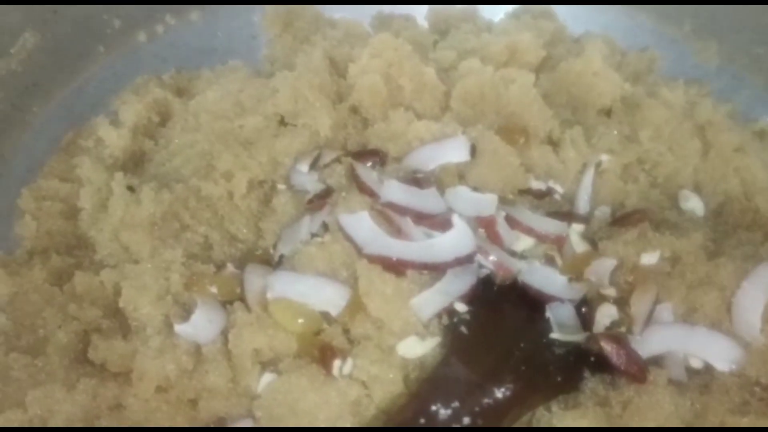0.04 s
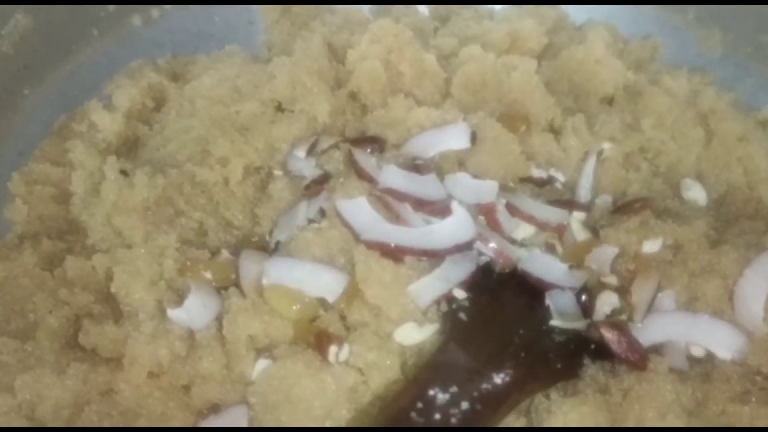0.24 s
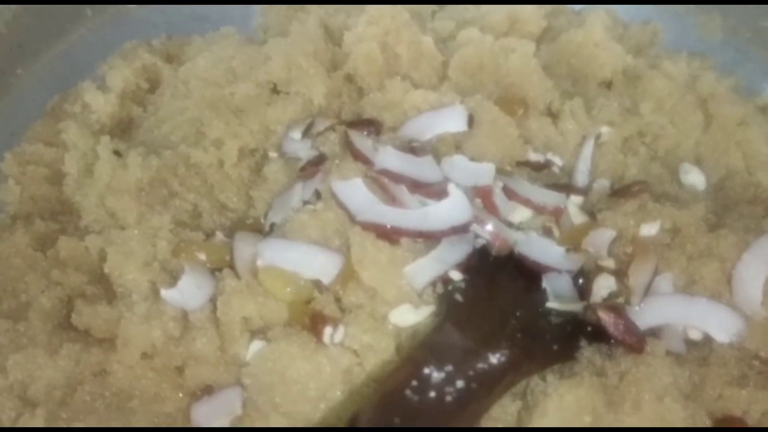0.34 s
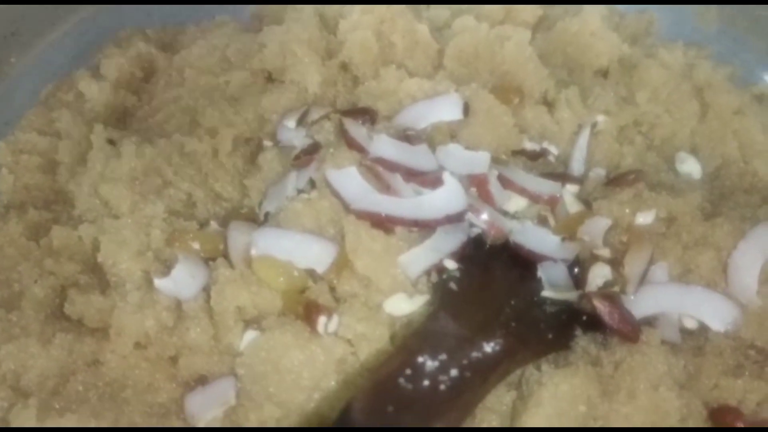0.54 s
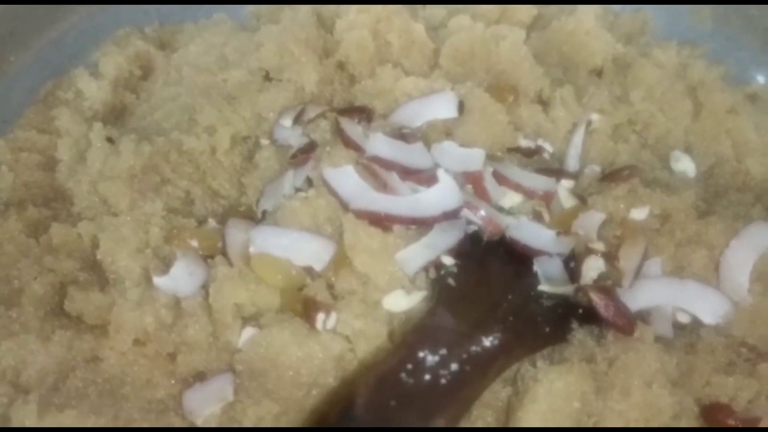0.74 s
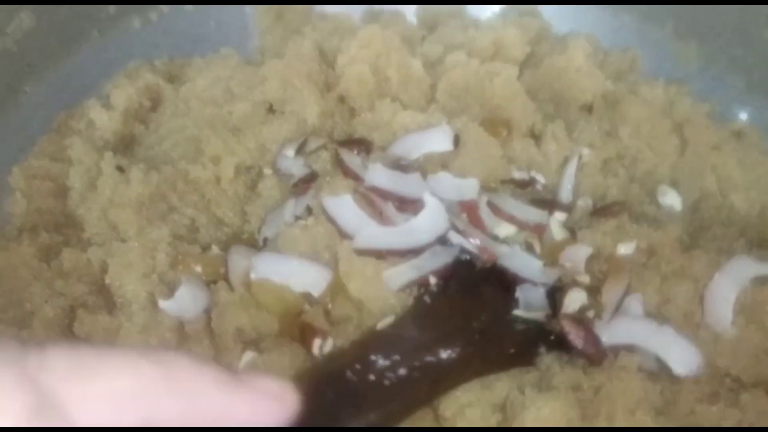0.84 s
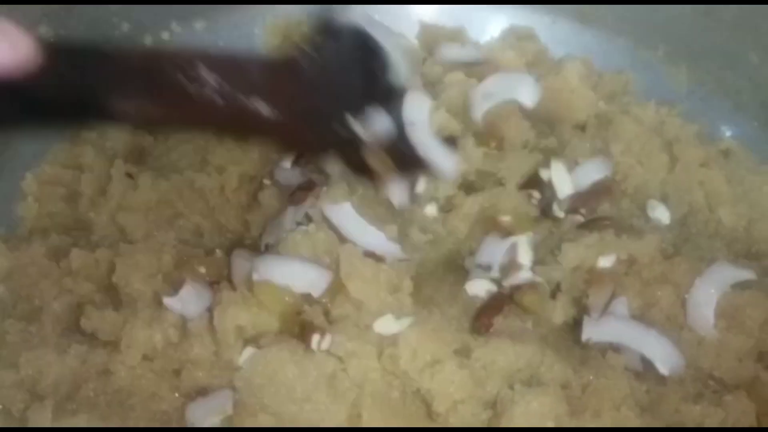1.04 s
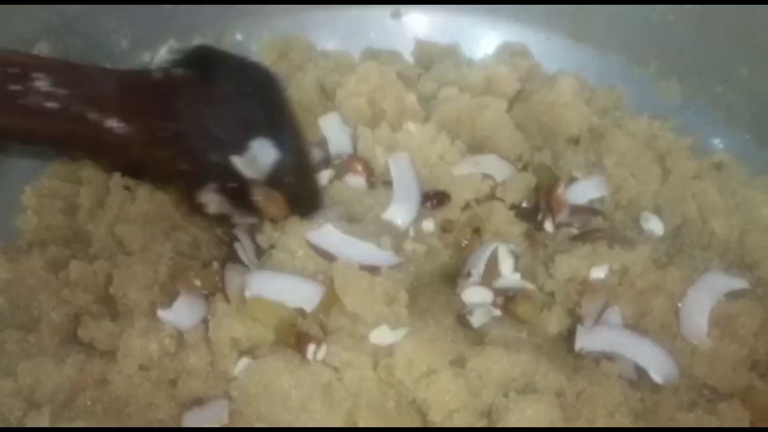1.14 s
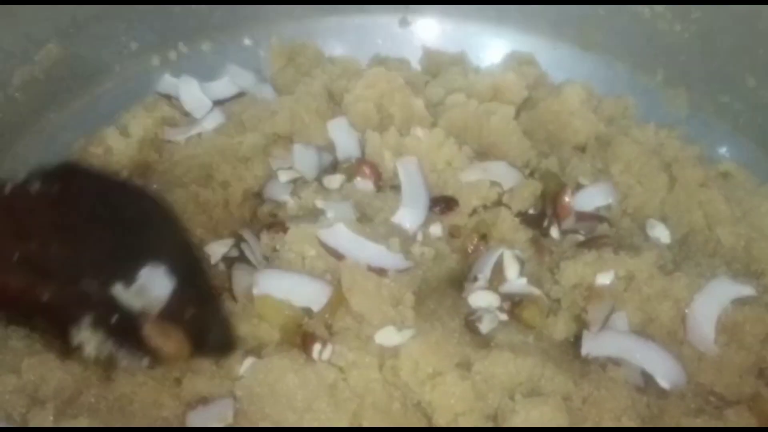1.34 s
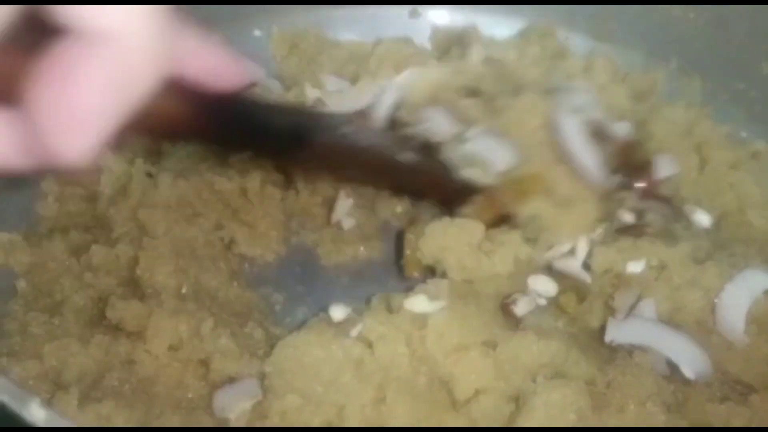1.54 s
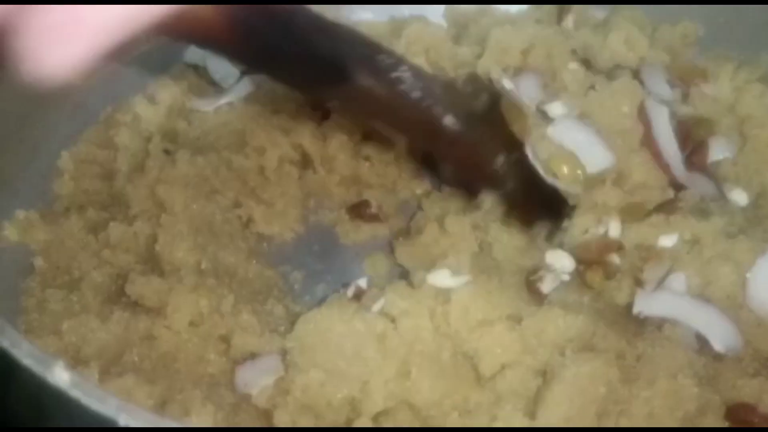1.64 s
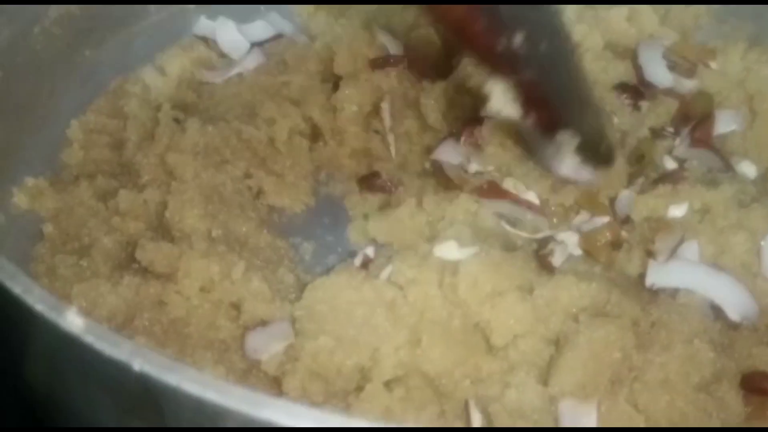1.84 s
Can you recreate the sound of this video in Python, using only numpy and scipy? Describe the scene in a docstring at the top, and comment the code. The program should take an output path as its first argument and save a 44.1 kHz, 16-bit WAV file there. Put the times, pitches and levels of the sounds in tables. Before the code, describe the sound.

A wooden spoon scrapes and knocks a metal pot of thick semolina: a hard gritty dig first, a softer push, then a short turning scrape, heard close in a small kitchen over faint hiss.

```python
"""Stirring thick halwa in a metal pot

A wooden spoon works thick semolina halwa in a metal pot, close by in a small kitchen, in three strokes.
The spoon knocks the pot (damped modes) and scrapes over its bottom (irregular slip bursts through resonances).
The pot sings faintly when pressed and drums low on its support; the mixture squeaks and rustles.
Under it lie a low hum, soft air noise and a hiss almost wholly on the left, with two thin high ticks."""
import sys
import numpy as np
from scipy import signal
from scipy.fft import rfft, irfft, next_fast_len
from scipy.io import wavfile
from scipy.ndimage import uniform_filter1d, map_coordinates

SR = 44100
rng = np.random.default_rng(int(sys.argv[2]) if len(sys.argv) > 2 else 0)


def wrap_up_sound(samples):
    """Save the sound to the file named by the first command line argument, as 16-bit audio."""
    columns = np.atleast_2d(samples).T
    # keep every value between -1 and 1, then stretch to whole-number steps
    tamed = np.clip(columns, -1, 1)
    steps = np.round(tamed * 32767).astype(np.int16)
    wavfile.write(sys.argv[1], SR, steps)


N = 83790


def amp(db):
    """Decibels to gain."""
    return 10 ** (np.asarray(db) / 20)


def unit(x):
    """Scale to rms 1."""
    return x / np.sqrt(np.mean(x ** 2) + 1e-20)


def along(points, hz):
    """Read a curve of (Hz, value) points on a log frequency axis."""
    f, v = np.transpose(points)
    return np.interp(np.log(hz + 1), np.log(f + 1), v)


def gains(rows):
    """A gain per sample for each dB column, silent outside the rows."""
    s, *cols = np.transpose(rows)
    t = np.arange(N) / SR
    inside = (t >= s[0]) * (t <= s[-1])
    return [amp(np.interp(t, s, c)) * inside for c in cols]


def filtered(x, response):
    """Shape x by a response of frequency, padded so the tail does not wrap."""
    m = next_fast_len(x.shape[-1] + 8192)
    shaped = irfft(rfft(x, m) * response(np.fft.rfftfreq(m, 1 / SR)), m)
    return shaped[..., :x.shape[-1]]


def add(out, s, x):
    """Mix x into out at time s."""
    i = round(s * SR)
    out[:, i:i + x.shape[1]] += x[:, :N - i]


# stereo width, 1 = both sides the same: pitch_hz [Hz], likeness [0-1]
LIKENESS = [(60, 0.92), (130, 0.98), (220, 0.89), (400, 0.7), (700, 0.67), (1300, 0), (2400, 0),
            (15000, 0.3)]


def half_angle(hz):
    """Half the phase angle whose cosine is the left-right likeness."""
    return np.arccos(np.clip(along(LIKENESS, hz), -1, 1)) / 2


def spread(pair):
    """Turn two unrelated signals into left and right, most alike in the bass."""
    mid_side = lambda hz: np.array([np.cos(half_angle(hz)), np.sin(half_angle(hz))])
    mid, side = filtered(pair, mid_side)
    return np.array([mid + side, mid - side])


def noise(spectrum):
    """Coloured stereo noise of rms 1."""
    pair = spread(rng.standard_normal((2, N)))
    return unit(filtered(pair, lambda hz: amp(along(spectrum, hz))))


def ring(modes, t):
    """Damped sine modes, slightly scattered in level; the less alike ones differ in phase left to right."""
    out = np.zeros((2, len(t)))
    for hz, db, t60, *_ in modes:
        apart = half_angle(hz) * rng.choice([-1, 1]) * np.array([[1], [-1]])
        decay = amp(db + rng.normal(0, 1.1) - 60 * t / t60)
        out += decay * np.sin(2 * np.pi * hz * t + apart)
    return out


# colours of the three steady beds: pitch_hz [Hz], level_db [dB, relative]
HUM_COLOUR = [(25, -34), (50, -25), (80, -2), (115, 6), (170, 1), (280, -16), (600, -46)]
AIR_COLOUR = [(40, -20), (150, -19), (300, 1), (420, 2), (750, -3), (1100, -5), (1450, 3), (2600, -5),
              (4100, -4), (4600, 6.5), (5400, 11), (6200, -3.5), (7000, -10), (9000, -66)]
HISS_COLOUR = [(3500, -75), (4200, -28), (4500, 3), (5400, -5.5), (7000, 1), (9300, -7.5), (12000, -2),
               (15700, 2.5)]
# slow level of the whole bed: time_s [s], level_db [dB]
BED_LEVEL = [(0, 0), (.55, -0.5), (.8, 0.5), (1.2, 0), (1.5, 0.5), (1.9, 0.5)]
HUM_DB, AIR_DB, HISS_LEFT_DB = -65, -57, -46
HISS_RIGHT_DB = -33.5  # relative to the left
HISS_GRAIN_DB, HISS_WAVER_DB, WAVERS_PER_S = 2, 0.13, 13.9
SPITS_PER_S, SPIT_DB = 20, 5


def background():
    """Low hum, soft air noise and a grainy, wavering hiss with random 1 ms spits."""
    t = np.arange(N) / SR
    grain_db = HISS_GRAIN_DB * unit(uniform_filter1d(rng.standard_normal(N), size=50))
    spit_starts = rng.random(N) < SPITS_PER_S / SR
    spits = np.minimum(np.convolve(spit_starts, np.ones(SR // 1000), "same"), 1)
    waver_db = HISS_WAVER_DB * map_coordinates(rng.standard_normal(SR // 100), [t * WAVERS_PER_S])
    hiss = unit(noise(HISS_COLOUR) * amp(grain_db + waver_db + SPIT_DB * spits))
    hiss = hiss * amp([[HISS_LEFT_DB], [HISS_LEFT_DB + HISS_RIGHT_DB]])
    level = amp(np.interp(t, *np.transpose(BED_LEVEL)))
    return level * (amp(HUM_DB) * noise(HUM_COLOUR) + amp(AIR_DB) * noise(AIR_COLOUR) + hiss)


# thin high ticks: start_s [s], level_db [dB, on the left], fall_30db_s [s to fall 30 dB]
HIGH_TICKS = [(.895, -41, 0.016), (1.649, -42.5, 0.056)]
TICK_HZ, TICK_WIDTH_HZ = 11460, 140


def ticks():
    """Narrow bands of decaying noise, very high and stronger on the left."""
    out, t = np.zeros((2, N)), np.arange(SR // 10) / SR
    narrow = lambda hz: 1 / np.hypot(1, (hz - TICK_HZ) / TICK_WIDTH_HZ)
    for s, db, fall_s in HIGH_TICKS:
        band = unit(filtered(rng.standard_normal((2, len(t))), narrow))
        add(out, s, band * amp(db - 30 * t / fall_s))
    return out * amp([[0], [-9]])


ROOM_T60_S, ROOM_DB = 0.19, -7.5


def room(x):
    """The kitchen's short reverberation: decaying noise that begins after 5 ms."""
    t = np.arange(SR // 2) / SR
    tail = rng.standard_normal((2, len(t))) * amp(-60 * t / ROOM_T60_S) * (t > .005)
    wet = signal.fftconvolve(x, tail / np.linalg.norm(tail[0]), axes=1)[:, :N]
    return amp(ROOM_DB) * wet


# the pot on its support: pitch_hz [Hz, before the thud's ratio], level_db [dB, relative], t60_s [s]
SUPPORT_MODES = [(67, -11.5, 0.18), (106.8, 4, 0.17), (158.7, -1.5, 0.15), (195, -7.5, 0.093)]
# thuds of the rocking pot: start_s [s], level_db [dB, relative], pitch_ratio [x], rise_s [s]
ROCKING_THUDS = [(0.238, -35, 0.85, 0.0068), (.266, -28, 1.01, 0.0035), (0.305, -30.5, 0.96, 0.0034),
                 (0.345, -31, 0.98, .004), (0.419, -33, 1.03, 0.021), (0.464, -23.5, 0.97, 0.051),
                 (.61, -29.5, 0.89, 0.0046), (.634, -32, 0.91, 0.0062), (.659, -28.5, 1.08, 0.0023),
                 (0.732, -29.5, 1, 0.0047), (0.745, -32.5, 0.93, 0.0014), (0.784, -37.5, 1.46, 0.0023),
                 (0.831, -43.5, 0.77, 0.0019), (.875, -38.5, 1.2, 0.018), (.97, -49.5, 1.06, 0.014),
                 (1.091, -43.5, 1.05, 0.034), (1.134, -37.5, 0.98, 0.024), (1.202, -47, 1.29, 0.0067),
                 (1.462, -42, 1.02, 0.0069), (1.515, -44, 1.3, 0.009)]


def rocking():
    """Each shove makes the heavy pot drum on its support: low damped modes with a soft rise."""
    out, t = np.zeros((2, N)), np.arange(SR // 2) / SR
    for s, db, ratio, rise in ROCKING_THUDS:
        modes = [(hz * ratio, level, t60) for hz, level, t60 in SUPPORT_MODES]
        drum = ring(modes, t).mean(axis=0, keepdims=True)
        add(out, s, amp(db) * (1 - np.exp(-t / rise)) * drum)
    return filtered(out, lambda hz: hz ** 4 / (hz ** 4 + 45 ** 4))


# spoon dragging: start_s [s], length_s [s], start_hz [Hz], end_hz [Hz], level_db [dB, at the swell's top]
DRAG_SQUEAKS = [(1.03, 0.15, 1447, 1468, -66), (1.239, 0.1, 1340, 1366, -65),
                (1.283, 0.25, 425.6, 410.6, -61), (1.766, 0.12, 411, 363, -74)]
SQUEAK_WAVER = 0.027  # rms fraction of the pitch


def squeaks():
    """The spoon drags through the sticky mass: faint gliding tones that waver and swell."""
    out = np.zeros((2, N))
    for s, length, start_hz, end_hz, db in DRAG_SQUEAKS:
        u = np.linspace(0, 1, int(length * SR))
        waver = unit(uniform_filter1d(rng.standard_normal(N), size=300))[:len(u)]
        pitch_hz = (start_hz + (end_hz - start_hz) * u) * (1 + SQUEAK_WAVER * waver)
        phase = 2 * np.pi * np.cumsum(pitch_hz) / SR
        swell = amp(db) * np.sqrt(2) * np.sin(np.pi * u)
        add(out, s, swell * np.sin(phase + np.array([[0], [1]])))
    return out


# crumbling mixture: start_s [s], level_db [dB, before rise and decay], centre_hz [Hz], t60_s [s]
CRUMBLE_RUSTLES = [(0.235, -29, 12500, 0.054), (.596, -33, 7080, 0.04), (1.225, -49, 2430, 0.12),
                   (1.46, -49.5, 6070, .16), (1.819, -47, 5830, 0.15)]


def crumbles():
    """The mixture crumbles: sparse random grains in a broad band, rising fast and dying away."""
    out, t = np.zeros((2, N)), np.arange(SR // 5) / SR
    for s, db, centre_hz, t60 in CRUMBLE_RUSTLES:
        grains = rng.standard_normal((2, len(t))) * (rng.random(len(t)) < .1)
        band = unit(filtered(grains, lambda hz: np.exp(-np.log((hz + 1) / centre_hz) ** 2)))
        add(out, s, band * amp(db - 60 * t / t60) * (1 - np.exp(-t / 0.0037)))
    return out


# tones of the pressed pot: pitch_hz [Hz], level_db [dB, before the swell]
SING_TONES = [(446.8, -54), (629.8, -50), (791.3, -61.5), (1007, -51.5), (1367, -50.5), (1491, -72),
              (1830, -63), (2030, -63), (2353, -63)]
# swell of the singing: time_s [s], level_db [dB]
SING_SWELL = [(1.455, -29), (1.466, 4), (1.476, 1.5), (1.49, -8), (1.515, -0.5), (1.58, -22)]


def sing():
    """Pressed by the spoon, the pot holds a few faint steady tones under one swell."""
    t = np.arange(N) / SR
    tones = np.zeros((2, N))
    for hz, db in SING_TONES:
        phase = rng.uniform(0, np.pi, (2, 1))
        tones += amp(db) * np.sqrt(2) * np.sin(2 * np.pi * hz * t + phase)
    return tones * gains(SING_SWELL)[0]


# modes of the pot: pitch_hz [Hz], level_db [dB, relative], t60_s [s], lift_db [dB added to a scrape]
POT_MODES = [(454, -14.5, 0.17, 7), (626, -26, 0.21, 2.5), (678, -13, 0.18, 2.5), (826, -7, 0.4, 3.5),
             (906, -9.5, 0.47, 3.5), (1012.6, -1.5, 0.2, 4.5), (1084, -8, 0.14, 7), (1361, -14, 0.3, 6),
             (1823, -5, 0.36, 2), (1875, -3.5, .55, 5), (1963, -9.5, 0.45, 3.5), (2262, -7, 0.32, 8.5),
             (2470, -9, 0.22, 0.5), (2919, -0.5, 0.18, 11), (3580, -24, .18, 8), (3930, -9, .22, 4.5),
             (4400, 5.5, 0.082, 10), (4620, -4, 0.066, 0), (5190, -11, .15, 2)]
# the spoon's hollow clack: pitch_hz [Hz], level_db [dB, relative], t60_s [s]
SPOON_MODES = [(584, -15, 0.067), (1110, -6.5, 0.035), (1850, -35, .025), (2397, -7, 0.052),
               (2583, -6.5, 0.019), (3777, -13, 0.098), (4380, -20, 0.032)]
# knocks, before the dulling: start_s [s], clack_db, ring_db, crack_db [dB], brightness_hz [Hz, low-pass]
SPOON_KNOCKS = [(0.2271, -22, -45, -62, 960), (0.2344, -24.5, -32.5, -22.5, 5230),
                (.252, -38, -39.5, -26.5, 5500), (0.299, -26, -47, -24, 3530),
                (0.3435, -35, -48, -20, 2230), (.438, -67, -43.5, -52, 2950), (.601, -47, -51, -46, 4000),
                (.71, -50, -49, -57, 1020), (0.7451, -31.5, -50.5, -25, 2940),
                (1.518, -19, -73, -27.5, 4000), (1.5974, -32, -64, -42, 1120)]
CRACK_T60_S = 0.06


def knocks():
    """The spoon meets the pot: a crack, a wooden clack and the metal's ring, duller through the mixture."""
    out, t = np.zeros((2, N)), np.arange(SR // 2) / SR
    for s, clack_db, ring_db, crack_db, bright_hz in SPOON_KNOCKS:
        crack = spread(rng.standard_normal((2, len(t)))) * amp(crack_db - 60 * t / CRACK_T60_S)
        crack = filtered(crack, lambda hz: hz ** 2 / (hz ** 2 + 300 ** 2))
        blow = crack + amp(clack_db) * ring(SPOON_MODES, t) + amp(ring_db) * ring(POT_MODES, t)
        dulling = signal.butter(3, bright_hz, fs=SR, output="sos")
        add(out, s, signal.sosfilt(dulling, blow))
    return out


SLIPS_PER_S, SLIP_SCATTER_DB, SLIP_T60_S = 560, 3.5, .016


def slips():
    """The spoon sticks and slips at uneven intervals, each slip a tiny noise burst of random size."""
    out, t = np.zeros((2, N)), np.arange(SR // 50) / SR
    times = np.cumsum(rng.uniform(.2, 1.8, 2000)) / SLIPS_PER_S
    sizes = rng.standard_normal(len(times))
    for s, size in zip(times[times < N / SR - .001], sizes):
        decay = amp(SLIP_SCATTER_DB * min(size, 2) - 60 * t / SLIP_T60_S)
        add(out, s, decay * rng.standard_normal((2, len(t))))
    return out


MODE_HALF_WIDTH_HZ = 40
BODY_DB, GRIT_DB, GRIT_HZ = -2, -1.5, 1574  # trims, and the split between body and grit


def scrape(start_s, levels, colour):
    """Slips coloured by the pot's resonances, split into a low body and a bright grit."""
    def response(hz):
        lift_db = sum(db / (1 + ((hz - f) / MODE_HALF_WIDTH_HZ) ** 2) for f, _, _, db in POT_MODES)
        low_cut = hz ** 2 / (hz ** 2 + 170 ** 2)
        return amp(along(colour, hz) + lift_db) * low_cut / (1 + (hz / 7000) ** 12)

    rub = filtered(spread(slips()), response)
    low = filtered(rub, lambda hz: 1 / (1 + (hz / GRIT_HZ) ** 8))
    body, grit = gains(levels)
    touching = np.arange(N) / SR >= start_s
    return touching * (amp(BODY_DB) * body * unit(low) + amp(GRIT_DB) * grit * unit(rub - low))


# how hard each stroke scrapes: time_s [s], body_db [dB, before trim], grit_db [dB, before trim]
DIG_LEVELS = [(0.233,-35,-27.5),(0.244,-26,-21.5),(.262,-30.5,-26.5),(.285,-30.5,-32.5),(.31,-34.5,-31),(.35,-31.5,-36),(.385,-39.5,-38),(0.441,-46,-45.5),(0.509,-63,-60),(.57,-64,-63)]
PUSH_LEVELS = [(.588,-62,-68),(.6,-42,-43),(.611,-34,-36),(.628,-42,-43),(.658,-41,-48),(.698,-47,-56),(.716,-38,-54),(.736,-42,-44),(.746,-35,-40),(.76,-41,-41.5),(.87,-70,-68)]
TURN_LEVELS = [(1.517,-52,-50),(1.522,-38,-32),(1.538,-37.5,-47),(1.556,-37,-39.5),(1.585,-38.5,-43.5),(1.603,-35,-48),(1.636,-53,-48.5),(1.646,-52,-69),(1.67,-61,-76)]
# colour of each scrape, before the pot's lift: pitch_hz [Hz], level_db [dB, relative]
DIG_TONE = [(120, -19), (200, 8), (328, -2), (443, -6.5), (591, -6), (812, 4), (1490, -7.5), (1610, -17.5),
            (1890, -0.5), (2150, -19.5), (2400, -9.5), (2900, -10), (3200, -16.5), (4540, -18.5),
            (9000, -32), (11700, -63), (19800, -120)]
PUSH_TONE = [(120, -43), (200, 10), (413, -16.5), (475, -8.5), (743, -11.5), (815, -6.5), (922, -24.5),
             (1060, -2.5), (1180, -19), (1510, -9.5), (2060, -28.5), (2440, -25.5), (8000, -32.5),
             (10400, -65), (17600, -120)]
TURN_TONE = [(120, -60), (200, -45), (323, -23), (439, -8), (636, 1), (778, -10.5), (981, -0.5), (1490, -4),
             (2090, -28), (2290, -19), (2890, -26), (5110, -22.5), (8000, -26), (10400, -61), (17600, -120)]
DIG_START_S, PUSH_START_S, TURN_START_S = .234, .585, 1.517


def strokes():
    """Three scrapes over the pot's bottom: a dig, a push and a turn."""
    dig = scrape(DIG_START_S, DIG_LEVELS, DIG_TONE)
    push = scrape(PUSH_START_S, PUSH_LEVELS, PUSH_TONE)
    turn = scrape(TURN_START_S, TURN_LEVELS, TURN_TONE)
    return dig + push + turn


# brief level dips: start_s [s], depth_db [dB], length_s [s]
LEVEL_DIPS = [(0.875, 11, .1), (1.638, 6, 0.11)]
DIP_FALL_S = 0.01


def dips():
    """Gain of the brief dips: a quick fall, a hold to half the length, a slower return."""
    t, dip_db = np.arange(N) / SR, np.zeros(N)
    for s, depth, length in LEVEL_DIPS:
        dip_db += np.interp(t, [s, s + DIP_FALL_S, s + length / 2, s + length], [0, depth, depth, 0])
    return amp(-dip_db)


# colour of the right side against the left: pitch_hz [Hz], gain_db [dB]
RIGHT_COLOUR = [(200, 1.5), (290, -7), (380, 4), (520, 6), (900, 1), (6000, -1), (7500, -22), (12000, -26)]
LEFT_LAG_S = 0.00031


def scene():
    """Three strokes in the kitchen over the background; the level dips briefly twice, the ticks do not."""
    spoon = knocks() + sing() + squeaks() + crumbles() + strokes()
    right_side = lambda hz: amp(np.array([0 * hz, along(RIGHT_COLOUR, hz)]))
    heard = filtered(spoon + room(spoon), right_side)
    # the drumming reaches the left side slightly late
    lag = lambda hz: np.exp(-2j * np.pi * hz * np.array([[LEFT_LAG_S], [0]]))
    drum = filtered(rocking(), lag)
    return (heard + drum + background()) * dips() + ticks()


TOP_HZ = 16000


def record(dry):
    """Nothing is kept above the band limit."""
    return filtered(dry, lambda hz: hz < TOP_HZ)


dry = scene()
out = record(dry)
wrap_up_sound(out)
```